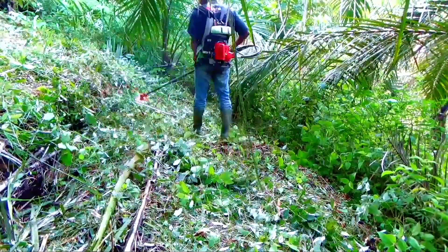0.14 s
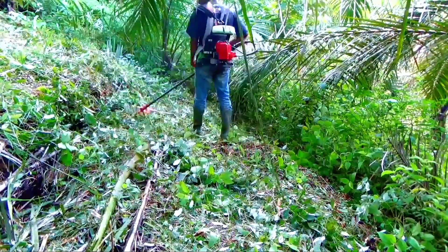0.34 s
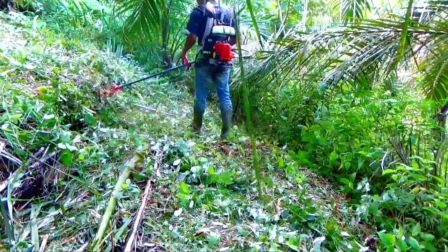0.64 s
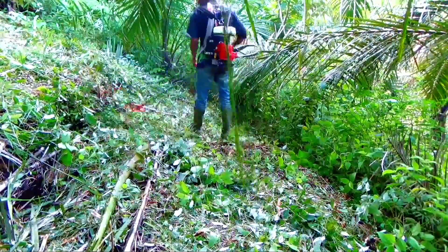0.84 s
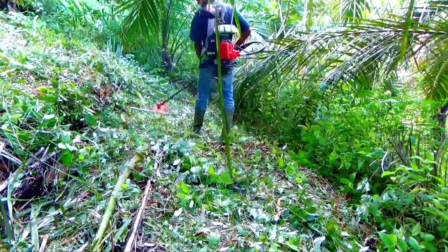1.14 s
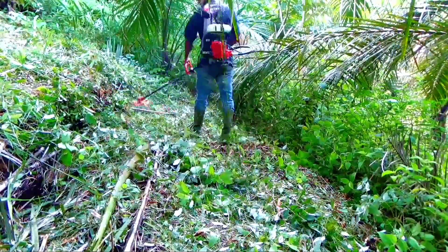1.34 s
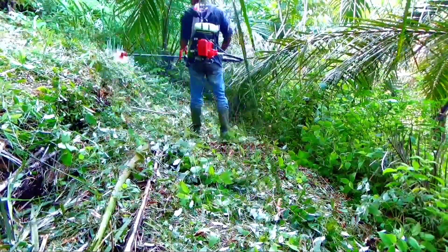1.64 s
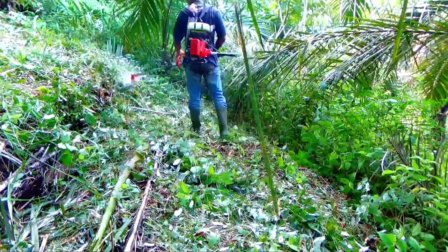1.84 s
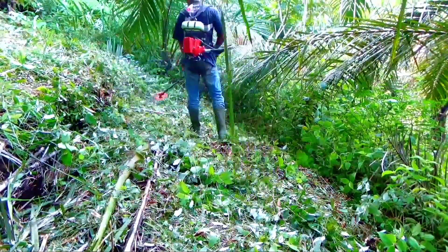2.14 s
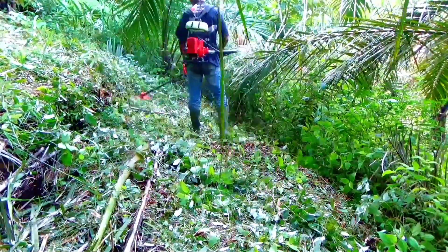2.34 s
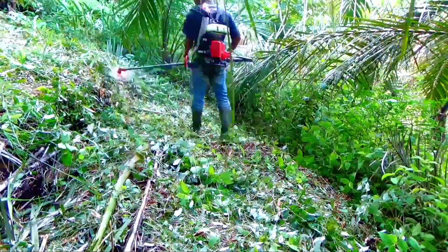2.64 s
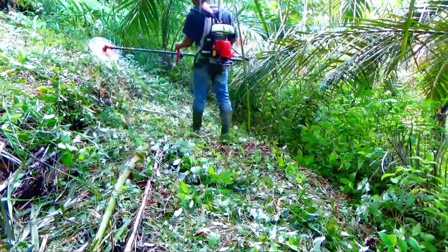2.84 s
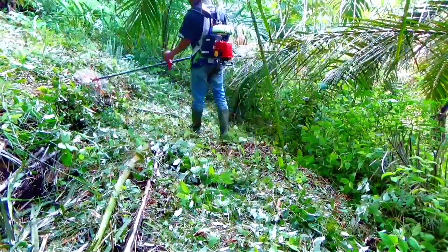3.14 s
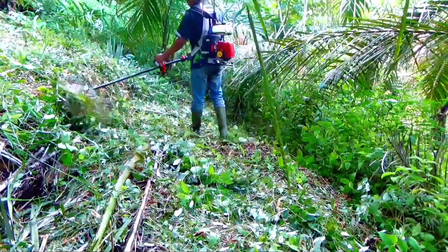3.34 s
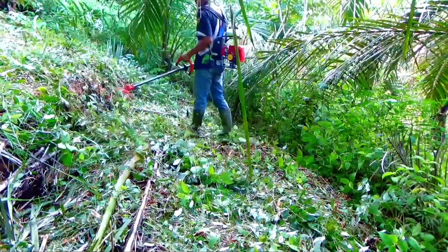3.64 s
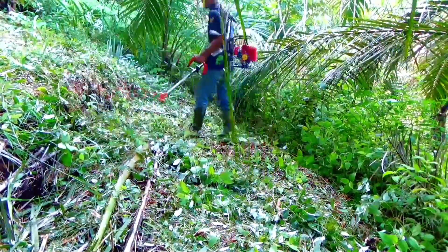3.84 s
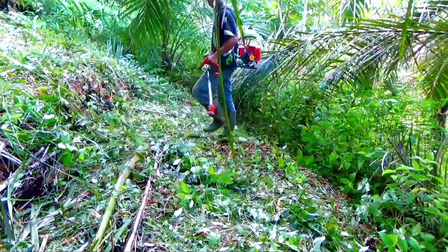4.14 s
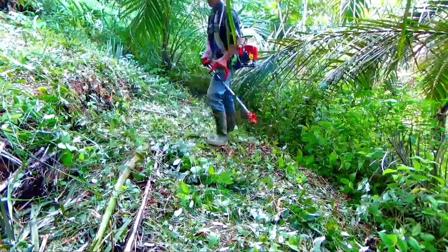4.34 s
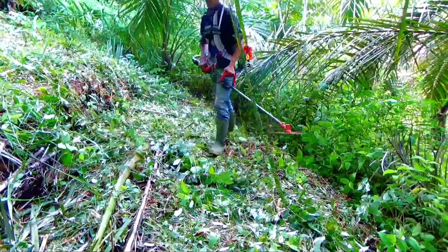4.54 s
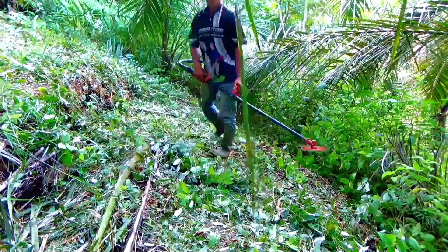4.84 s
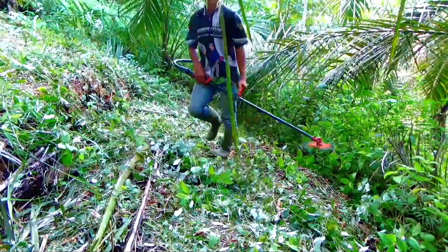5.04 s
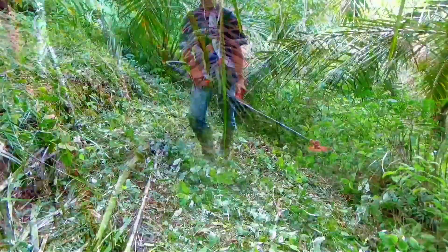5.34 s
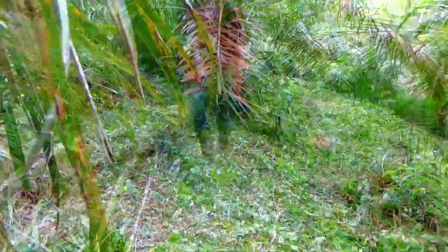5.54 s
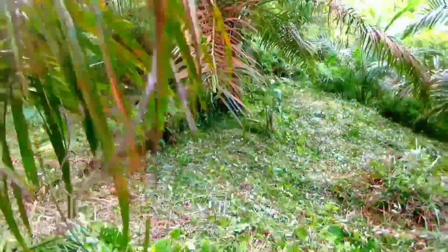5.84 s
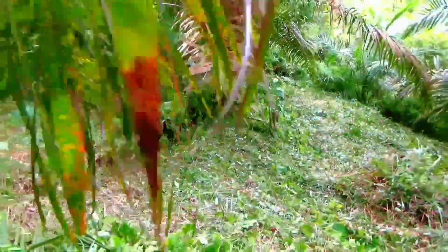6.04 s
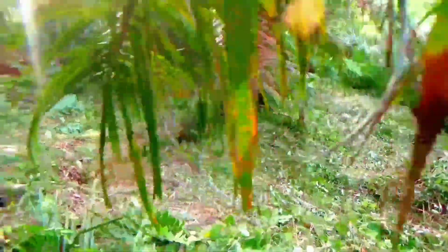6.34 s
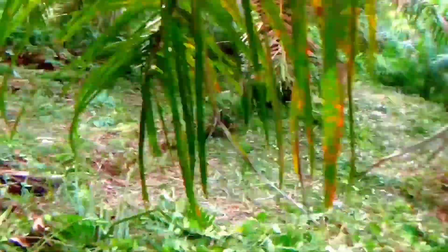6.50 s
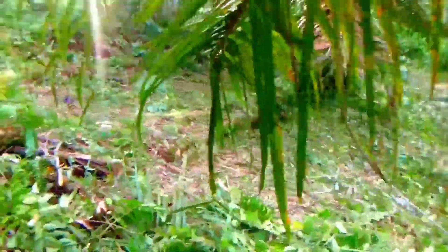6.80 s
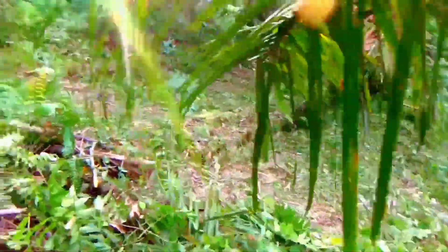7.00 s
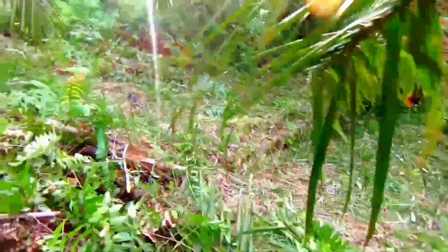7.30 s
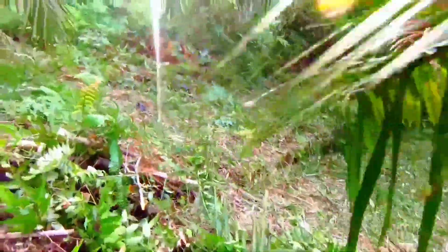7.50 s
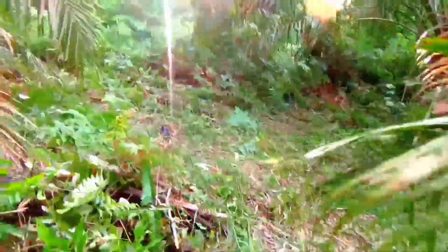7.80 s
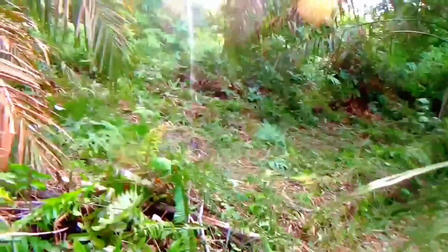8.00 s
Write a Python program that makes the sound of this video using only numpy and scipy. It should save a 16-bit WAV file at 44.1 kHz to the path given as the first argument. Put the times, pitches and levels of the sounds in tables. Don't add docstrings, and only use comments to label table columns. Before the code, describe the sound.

A petrol brush cutter snarls loudly and hisses through grass, coasts down humming and popping, then cuts to a quiet insect grove with rustling fronds.

```python
import sys
import numpy as np
from scipy import signal
from scipy.fft import rfft, irfft, next_fast_len
from scipy.io import wavfile
from scipy.ndimage import uniform_filter1d

SR = 44100
rng = np.random.default_rng(int(sys.argv[2]) if len(sys.argv) > 2 else 0)


def gain_from_db(level_db):
    decades = np.asarray(level_db, float) / 20
    return 10 ** decades


def wrap_up_sound(samples):
    columns = np.atleast_2d(samples).T
    tamed = np.clip(columns, -1, 1)
    steps = np.round(tamed * 32767).astype(np.int16)
    wavfile.write(sys.argv[1], SR, steps)


N = 360032
TIME = np.arange(N) / SR
BINS = next_fast_len(N)
HOLD = 64
SLOW_TIME = TIME[::HOLD]
SHUT_S, CUT_S = 3.785, 5.826


def level(x, db):
    return x * gain_from_db(db) / np.sqrt(np.mean(x ** 2))


def along(table):
    hz, value = np.transpose(table)
    bin_hz = np.arange(BINS // 2 + 1) * SR / BINS
    return np.interp(np.log(bin_hz + 1), np.log(hz + 1), value)


def shape(x, gain):
    return irfft(rfft(x, BINS) * gain, BINS)[..., :N]


def colour(x, table):
    return level(shape(x, gain_from_db(along(table))), 0)


def peak(x, hz, width):
    return signal.lfilter(*signal.iirpeak(hz, hz / width, SR), x)


def ramp(start_s, length_s):
    return np.clip((TIME - start_s) / length_s, 0, 1)


def sway(db, rate):
    k = int(SR / HOLD / rate)
    steps = np.repeat(rng.standard_normal(N // HOLD // k + 2), k)
    slewed = uniform_filter1d(uniform_filter1d(steps, k), k)
    return np.interp(TIME, np.arange(len(steps)) * HOLD / SR, gain_from_db(db * slewed))


def ring(x, modes, sway_db=0., rate=5):
    out = 0
    for k, (hz, width, db) in enumerate(modes):
        out = out + (-1) ** k * gain_from_db(db) * sway(sway_db, rate) * peak(x, hz, width)
    return out


def ringing(shake, rows, sharpness):
    out = np.zeros((2, N))
    for s, length, hz, db in rows:
        span = slice(int(s * SR), int((s + length) * SR))
        tone = level(peak(shake[:, span], hz, hz / sharpness), db)
        out[:, span] += tone * signal.windows.tukey(tone.shape[1], min(.4, .08 / length))
    return out


def knocks(rows, cycles):
    out, t = np.zeros(N), TIME[:1500]
    for s, db, hz in rows:
        i = int(s * SR)
        out[i:i + len(t)] += gain_from_db(db) * np.exp(-t * hz / cycles) * np.cos(2 * np.pi * hz * t)
    return out


def swells(times, db, rise_s, fall_s):
    kicks, t = np.zeros(N), TIME[:SR // 4]
    kicks[(np.asarray(times) * SR).astype(int)] = gain_from_db(np.asarray(db))
    form = np.exp(-t / fall_s) * (1 - np.exp(-t / rise_s))
    return signal.oaconvolve(kicks, form / form.max())[:N]


def spells(rows, edge_s):
    shapes = []
    for s, length, db in rows:
        inside_s = np.minimum(SLOW_TIME - s, s + length - SLOW_TIME)
        shapes.append(db * np.clip(inside_s / edge_s + .5, 0, 1))
    return np.interp(TIME, SLOW_TIME, np.max(shapes, axis=0))


def stack(turns, colours, blend, phases, sway_db):
    out = 0
    for rows, phase in zip(zip(*colours), phases):
        multiple = rows[0][0]
        db = np.interp(blend[::HOLD], np.arange(len(rows)), [row[1] for row in rows])
        gain = np.repeat(gain_from_db(db), HOLD)[:N] * sway(sway_db, 12)
        out = out + gain * np.sin(2 * np.pi * (multiple * turns + phase))
    return level(out, 0)


# frequency in Hz, level in dB.
PORT_SCATTER = [(60, -10), (200, -19.5), (500, -3.5), (1500, 2), (8000, -1)]


def grains(scatter_db):
    luck = np.minimum(rng.exponential(size=(3, N)), 5)
    shared, left, right = rng.standard_normal((3, N)) * gain_from_db(scatter_db * luck)
    return level(shared + shape(np.array([left, right]), gain_from_db(along(PORT_SCATTER))), 0)


# frequency in Hz, lead of the left in radians.
PORT_PHASE = [(60, -0.97), (130, -.62), (260, -0.92), (430, -1.05), (1030, -1.3), (6120, -0.57),
              (11100, 0.9)]


def ports(x, pan_db):
    side = np.array([[.5], [-.5]])
    return shape(x, np.exp(1j * side * along(PORT_PHASE))) * gain_from_db(side * pan_db)


# frequency in Hz, level in dB per Hz.
AIR_COLOUR = [(24, -50), (40, -20), (118, -14), (334, -3.5), (942, -4.5), (4060, -14), (4360, -6),
              (5790, -19), (7330, 0), (11200, -22.5), (14600, -53), (22000, -120)]


def still_air(smooth):
    return level(colour(smooth, AIR_COLOUR), -64.5) * sway(2.1, 7.8)


def insects(crisp):
    cricket = peak(crisp, 4390, 45) * sway(4, 40)
    band = signal.butter(4, (6350, 8500), "band", fs=SR, output="sos")
    cicada = signal.sosfilt(band, crisp[:, ::-1]) * sway(2.1, 30) * sway(1.6, 4)
    return level(cricket, -77) + level(cicada, -65.5)


# peak in seconds, seconds to fade 20 dB before it and after it,
# rustle in dB, low scuff in dB.
BRUSHES = [(6.15, .08, .05, -71.5, -73), (6.29, 0, .05, -66.5, -77.5), (6.695, .07, .035, -51, -62),
           (6.65, .02, .02, -70, -62), (6.782, .03, .03, -49, -63), (6.91, .15, .03, -63, -75.5),
           (7.03, .15, .06, -66, -78), (7.115, 0.03, .04, -54, -61), (7.19, .05, 0.052, -63, -66),
           (7.35, 0.08, 0.077, -53, -66), (7.378, .04, .08, -69, -53), (7.405, .06, .07, -72, -52),
           (7.44, 0.06, 0.035, -69, -54), (7.59, .04, .05, -69.5, -63.5), (7.915, 0.05, .05, -54, -68),
           (7.955, .05, .02, -52.5, -62)]


def brushes():
    t = SLOW_TIME
    out = gain_from_db(np.array([-88, -85]))[:, None]
    for s, rise, fall, rustle_db, scuff_db in BRUSHES:
        fade_db = 20 * np.minimum((t - s) / rise, (s - t) / fall)
        out = out + gain_from_db(np.array([[rustle_db], [scuff_db]]) + fade_db)
    return [np.interp(TIME, t, gain) for gain in out]


# frequency in Hz, level in dB per Hz.
RUSTLE_COLOUR = [(120, -45), (200, -11), (598, -12), (1980, -10), (2190, -8), (2680, -5), (4990, -10),
                 (9000, 3), (11200, -7), (14600, -41), (22000, -120)]
# frequency in Hz, width in Hz, level in dB.
SCUFF_MODES = [(694, 52, -3), (990, 90, 1), (1183, 36, -1), (1706, 24, -12), (2130, 45, -10)]


def fronds(smooth, crisp):
    leafy, woody = brushes()
    rustle = colour(crisp, RUSTLE_COLOUR) * leafy * gain_from_db(3.5) * sway(1.6, 60)
    scrape = smooth[:, ::-1]
    hollow = peak(peak(scrape, 700, 760), 783, 1336)
    scuff = level(ring(scrape, SCUFF_MODES), -2.5) + level(hollow, -1.0)
    return rustle + scuff * woody * gain_from_db(-0.7) * sway(2.1, 50)


# time in seconds, peak in dB, body in Hz, body minus peak in dB.
SNAPS = [(6.775, -40, 926, -15), (6.7915, -20.5, 977, -28), (6.8103, -29, 3630, -21),
         (6.8302, -35, 2010, -22), (6.8925, -37, 2620, -15), (6.9172, -36, 1730, -26),
         (7.1228, -35, 1350, -10), (7.141, -38, 3240, -25), (7.2649, -47, 3470, -13),
         (7.347, -38, 1250, -17), (7.583, -45.5, 2650, -2), (7.9132, -42, 2710, -16.5),
         (7.9654, -42.5, 1640, -16)]


def snaps():
    body = knocks([(s, db + body_db + 9, hz) for s, db, hz, body_db in SNAPS], cycles=1.6)
    crack = knocks([(s, db + 6.0, 8600) for s, db, _, _ in SNAPS], cycles=2.1)
    return peak(body, 1740, 4000) + peak(crack, 7900, 7000)


def grove():
    smooth, crisp = grains(.3), grains(1.8)
    return ports(still_air(smooth) + insects(crisp) + fronds(smooth, crisp) + snaps(), 0)


def wind(chaff):
    return level(ring(chaff[:, ::-1], [(62, 40, 0)], sway_db=4.5), -60)


def whips(count, low_hz, high_hz):
    when, length, pitch, loud = rng.random((count, 4)).T
    hz = low_hz * (high_hz / low_hz) ** pitch ** .6
    return np.transpose([when * CUT_S, .04 + .1 * length, hz, 4 * loud])


# frequency in Hz, level in dB per Hz.
SWISH_COLOUR = [(2350, -25), (4000, -7), (4210, -18.5), (4710, -4), (5480, -7.5), (8650, 2.5), (10600, -1),
                (11200, -8), (14600, -38), (22000, -120)]


def blade_hiss(chaff):
    swish = colour(chaff, SWISH_COLOUR) * sway(0.7, 25) * sway(1.9, 70)
    stems = whips(count=500, low_hz=5200, high_hz=10400)
    return swish + gain_from_db(-18) * ringing(chaff, stems, sharpness=130)


# time in seconds, peak in dB.
STALKS = [(.0218, -8), (.0598, -10), (.1491, -9), (0.2094, -2), (.3217, -7), (0.3865, -5.5), (0.6499, 4),
          (.6759, -5), (0.7487, -4), (0.9936, -2.5), (1.0779, -4), (1.1643, -4), (1.3294, -6), (1.4252, -7),
          (1.5933, -6), (1.8277, -5), (1.8522, -4), (1.885, -6), (1.98, -5), (2.04, -12), (2.085, -6),
          (2.1241, 2), (2.15, -7), (2.1849, 1), (2.2114, -3), (2.235, -6), (2.2942, -7), (2.5446, 2),
          (2.5711, -4), (2.609, -5), (2.6683, -6), (2.7162, -3), (2.74, -5), (3.0729, 0), (3.1363, -3),
          (3.3134, -6), (3.4261, -5), (3.5468, -4), (3.5738, -5), (3.5992, -7), (3.6292, -1), (3.6551, -6),
          (3.6885, -2.5), (3.7145, -4), (3.9374, -6), (4.0083, -6), (4.1121, -5), (4.1834, -8),
          (4.4727, -6), (4.6079, -6), (4.7431, -6), (4.8888, -6), (5.0115, -2), (5.3323, -6), (5.462, -6),
          (5.5922, -6)]


def stalk_slaps():
    slaps = 1 + swells(*np.transpose(STALKS), rise_s=.003, fall_s=0.006) * gain_from_db(0.3)
    late_s, late_db, _ = np.transpose(POPS)
    return slaps + swells(late_s - .016, late_db, rise_s=0.0042, fall_s=0.012) * gain_from_db(-3)


# start in seconds, length in seconds, frequency in Hz, level in dB.
SHAFT_RINGS = [(.002, 1.15, 2023, -30), (.012, 1.25, 2490, -29.5), (0.002, 1.39, 4650, -27.5),
               (0.352, 0.19, 3860, -30.5), (0.78, .15, 1710, -31), (1.6, 0.32, 4550, -27.5),
               (1.65, 0.24, 2020, -31.5), (1.677, 0.23, 2490, -28.5), (1.899, .55, 3840, -32),
               (2.0, 0.95, 4660, -26), (2.746, 0.17, 2285, -30.5), (2.756, .11, 3779, -30.5),
               (2.775, 0.094, 7250, -25), (2.89, 0.16, 2034, -25), (2.914, 0.19, 4670, -27),
               (3.1, .32, 2963, -32), (3.198, 0.22, 3870, -30), (3.298, 0.49, 2326, -32.5),
               (3.313, .47, 4694, -24), (3.85, 0.41, 2043, -30.5), (3.9, 0.38, 1712, -31),
               (4.145, .25, 2730, -29.5), (4.29, .1, 1180, -34), (4.401, 0.16, 4240, -31),
               (4.5, .2, 1718, -29.5), (4.877, 0.11, 2980, -33.5), (5.21, 0.31, 2115, -35)]


def shaft_rings(gas, fired, slaps):
    return gain_from_db(.6) * slaps ** .9 * ringing(gas + gain_from_db(23) * fired, SHAFT_RINGS, sharpness=70)


# frequency in Hz, width in Hz, level in dB.
CASING_MODES = [(1680, 93, -9), (2490, 300, 5.5), (3100, 450, -1), (4660, 110, -2)]


def casing_rattle(gas, fired, power):
    shaken = ring(gas + gain_from_db(31) * fired, CASING_MODES, sway_db=5.0)
    return level(shaken, -6.5) * (0.26 + .65 * power)


# frequency in Hz, level in dB per Hz.
ROAR_COLOUR = [(18, -66.5), (30, -41), (344, -20), (469, -2.5), (850, -11), (1020, -6.5), (1390, -11.5),
               (2470, -2.5), (4120, -10.5), (4700, -12.5), (6000, -18), (7800, -32), (13200, -120)]


def exhaust_roar(gas):
    return sway(0.67, 15) * level(colour(gas, ROAR_COLOUR), -4.0)


# time in seconds, peak in dB, pitch in Hz.
POPS = [(4.122, -6, 600), (4.472, -7, 650), (4.53, -9, 700), (4.78, -12, 620), (4.985, -12, 620),
        (5.798, -7, 520), (5.247, -1.5, 620), (5.348, -2, 596), (5.392, -8, 558.6), (5.482, -3.5, 615),
        (5.512, -5, 560), (5.534, -4.5, 423), (5.594, -8, 450), (5.615, -9, 400), (5.667, -7, 500),
        (5.711, -6, 606), (5.749, -6, 700)]


def late_pops():
    pops = np.roll(knocks(POPS, cycles=.8), 60)
    return gain_from_db(.8) * peak(pops, 620, 1400) + gain_from_db(-7) * peak(pops, 2200, 500)


# multiple of the firing rate, level in dB.
COAST_FIRST = [(1, -31), (2, -18), (3, -16), (4, -3), (5, -7), (6, -2), (7, -6), (8, 0), (9, -9), (10, -7),
               (11, -9), (12, -15), (13, -16), (14, -15), (15, -6), (16, -12), (17, -7), (18, -7),
               (19, -10), (20, -14)]
COAST_FAST = [(1, -34), (2, -21), (3, -15), (4, 0), (5, -12), (6, -10), (7, -8), (8, 0), (9, -12.5),
              (10, -3.5), (11, -7.5), (12, -11.5), (13, -15), (14, -14.5), (15, -6.5), (16, -13.5),
              (17, -7.5), (18, -10), (19, -9.5), (20, -11.5)]
COAST_SLOW = [(1, -33.5), (2, -29), (3, -24), (4, -4.5), (5, -0.5), (6, -10), (7, -22.5), (8, -12),
              (9, -10.5), (10, -16.5), (11, -27.5), (12, -14.5)]


def coasting_hum(turns, hz, uneven, lag):
    slow = np.clip((52 - hz) / 5, 0, 1)
    fast = stack(turns, (COAST_FIRST, COAST_FAST), (64 - hz) / 3, .9 * lag, sway_db=2.6)
    idle = stack(turns, (COAST_SLOW,), hz, .8 * lag, sway_db=2.4)
    return uneven ** .9 * ((1 - slow) * fast * 1.35 + slow * idle * .95) * sway(1.6, 40)


# multiple, level in dB.
HALVES = [(2.5, -17), (3.5, 0), (4.5, -8), (5.5, -9), (7.5, -9), (8.5, -10)]
# start in seconds, length in seconds, rise in dB.
LOPES = [
    (1.2, .65, 8),
    (2.0, .4, 11),
    (2.45, .45, 17),
    (2.95, .25, 9),
    (3.35, .4, 15),
]


def uneven_beat(turns, hz, lag):
    return gain_from_db(spells(LOPES, .06) - 12) * stack(turns, (HALVES,), hz, lag, sway_db=3.5)


# frequency in Hz, width in Hz, level in dB.
MUFFLER_MODES = [(240, 60, -14.5), (480, 41.5, -1.5), (550, 87, -1.5), (721, 68, 0.5), (1009, 38.5, 2.5),
                 (1259, 130, -1.5)]
# multiple of the firing rate, level in dB.
FACING = [(1, -35), (2, -27), (3, -15), (4, -24), (5, -14.5), (6, 0.5), (7, -2.5), (8, -5), (9, -2),
          (10, -14), (11, -18), (12, -11.5), (13, 1), (14, -2.5), (15, -7), (16, -0.5), (17, -16)]
TURNED = [(1, -33), (2, -32.5), (3, -19), (4, -20), (5, -15), (6, 0), (7, -4), (8, -6.5), (9, -1.5),
          (10, -9), (11, -22), (12, -6.5), (13, -1), (14, -6), (15, -7.5), (16, -3), (17, -9.5)]
SIDEWAYS = [(1, -32), (2, -30), (3, -21), (4, -22), (5, -8), (6, 0), (7, -12), (8, -8), (9, -1), (10, -12),
            (11, -17), (12, -13), (13, -2), (14, -6), (15, -10), (16, -8), (17, -14)]
AWAY = [(1, -34), (2, -27), (3, -17), (4, -20), (5, -11), (6, 0), (7, -11), (8, -8), (9, -10), (10, -8),
        (11, -14), (12, -15), (13, -2), (14, -13), (15, -6), (16, -8), (17, -10)]


def muffler_bark(turns, gas, fired, uneven, power, lag):
    turned = ramp(1.2, .6) + ramp(2.8, .08) + ramp(3.2, .08)
    note = stack(turns, (FACING, TURNED, SIDEWAYS, AWAY), turned, .36 * lag, sway_db=2.7)
    puffs = ring(fired, MUFFLER_MODES, sway_db=3.5) + peak(gas, 750, 700) * gain_from_db(-30)
    return power * level(uneven ** .9 * note, -1.5) + level(puffs, -11) * (power + (1 - power) * 1.2)


# time in seconds, firing rate in Hz.
SPEED = [(0, 77.2), (1.1, 77.7), (1.34, 79.7), (1.62, 79.2), (1.82, 81.55), (1.91, 80.3), (1.98, 77.03),
         (2.8, 76.8), (2.88, 77.9), (3.19, 79.94), (3.26, 76.2), (3.76, 76.77), (3.82, 69.67),
         (4.07, 66.35), (4.53, 50.41), (4.78, 46.77), (5.09, 44.5), (5.48, 46.08)]


def firings(power):
    hz = np.interp(TIME, *np.transpose(SPEED))
    turns = np.cumsum(hz * sway(.052, 30) ** (1 + 1.5 * (1 - power))) / SR
    cycle, phase = turns.astype(int), turns % 1
    size = gain_from_db(2.2 * np.clip(rng.standard_normal(N // 100), -2, 1.3))[cycle]
    fired = np.diff(cycle, prepend=0) * size
    gas = size * (1.0 + np.exp(-phase / 0.16)) * grains(0.88)
    return hz, turns, fired, gas, uniform_filter1d(size, 300)


# time in seconds, level in dB, left minus
# right in dB.
STANCE = [(0, .5, 0), (1, 0, 0), (2.2, -1.2, 0), (2.5, 0, 0), (3.3, -.5, .6), (3.74, -3.5, -0.6),
          (3.98, 0, -0.1), (4.98, 0, -1.7), (5.1, -4, -1.5), (5.5, -2.5, -1.5), (5.8, -5.5, -1.5)]
# start in seconds, length in seconds, hiss rise in dB.
BITES = [(.24, .12, 4), (.36, .14, 6), (.5, .09, 3), (.65, .03, 3.5), (.95, 0.2, 5.5), (1.1, .12, 7),
         (1.25, 0.24, 7), (1.45, 0.19, 5), (1.63, 0.078, 3), (1.87, 0.13, 8.5), (1.96, .065, 7),
         (2.22, .21, 7), (2.45, .15, 1.5), (2.68, .16, 5), (2.86, .27, 1.5), (3.14, .36, 6),
         (3.94, .18, 1.5), (4.48, .08, 1.5), (5.24, 0.038, 2), (5.47, .18, 2)]
# start in seconds, length in seconds, depth in dB.
FALTERS = [(.41, 0.051, 2), (1.3, .1, 2), (1.77, .05, 2), (1.12, .07, 3), (1.91, .055, 13), (2.03, .05, 2),
           (2.76, .04, 4), (3.2, .28, 2.5), (3.78, .05, 14), (3.85, .1, 6), (4.41, .04, 3), (4.58, .16, 5),
           (4.9, .24, 3.5), (5.22, .12, 10), (5.37, .09, 5), (5.56, .03, 10)]


def cutter():
    stance_s, *columns = np.transpose(STANCE)
    near_db, pan_db = (np.interp(TIME, stance_s, c) for c in columns)
    power = np.clip((SHUT_S - TIME) / .015, 0, 1)
    hz, turns, fired, gas, uneven = firings(power)
    lag = rng.random(20)
    chaff, slaps = grains(2.5), stalk_slaps()

    def mix(on_db, off_db):
        return power * on_db + (1 - power) * off_db

    bite_db = spells(BITES, edge_s=.05)
    sag_db = 0.92 * bite_db + spells(FALTERS, edge_s=.033)
    muffler_db = mix(-14.2 + 1.1 * near_db, -18.5) - sag_db
    hum_db = mix(-36 - sag_db, -27.5 + .3 * near_db - 0.092 * sag_db)
    casing_db = mix(-19.5 + .15 * sag_db, -20.5 + .6 * sag_db) + 0.82 * near_db
    hiss_db = mix(-19.4, -16) + bite_db + .9 * near_db

    out = gain_from_db(hiss_db - 0.8) * blade_hiss(chaff) * slaps
    out += shaft_rings(gas, fired, slaps)
    out += gain_from_db(casing_db) * casing_rattle(gas, fired, power) * slaps ** 0.51
    out += gain_from_db(0.24 * muffler_db + 0.62 * casing_db) * exhaust_roar(gas) * slaps ** 0.22
    out -= late_pops()
    out += (1 - power) * gain_from_db(hum_db + 1.85) * coasting_hum(turns, hz, uneven, lag)
    out += power * gain_from_db(hum_db) * uneven_beat(turns, hz, lag)
    out += gain_from_db(muffler_db) * muffler_bark(turns, gas, fired, uneven, power, lag)
    out -= ramp(4.4, .4) * .65 * peak(out, 923, 220)
    return ports(out, pan_db) + wind(chaff)


def scene():
    before = np.clip((CUT_S - TIME) / .001, 0, 1)
    return before * cutter() + (1 - before) * grove()


def roll_off(x):
    return signal.sosfilt(signal.butter(12, 11540, fs=SR, output="sos"), x)


def record(dry):
    rounded = 1.446 * np.tanh(dry / 1.33)
    top_cut = signal.ellip(12, .2, 85, 11050, fs=SR, output="sos")
    return roll_off(np.clip(signal.sosfilt(top_cut, rounded), -1, 1))


dry = scene()
out = record(dry)
wrap_up_sound(out)
```